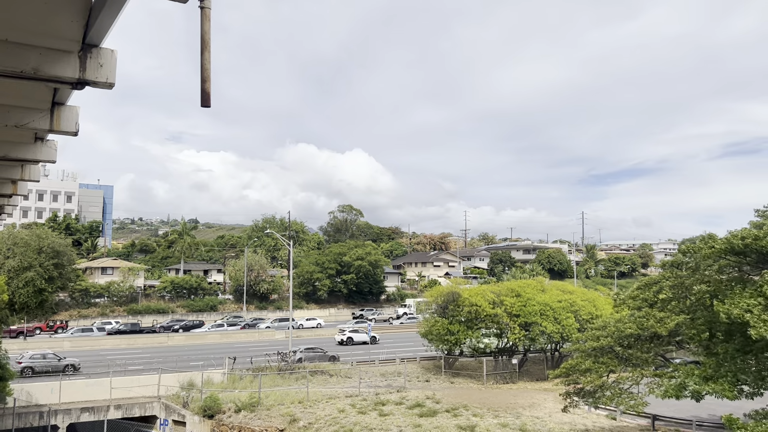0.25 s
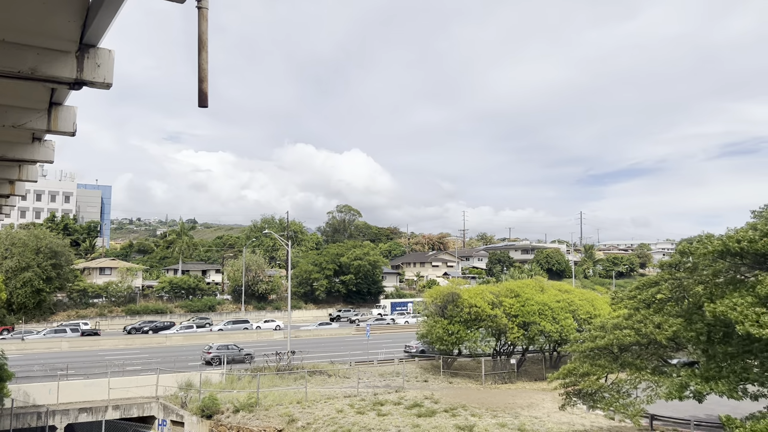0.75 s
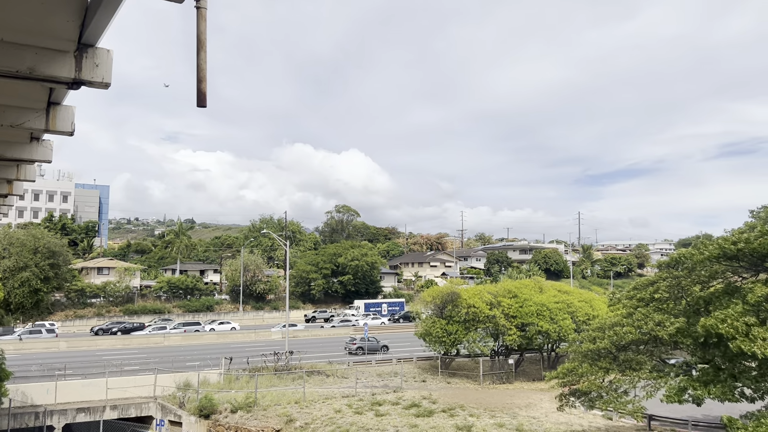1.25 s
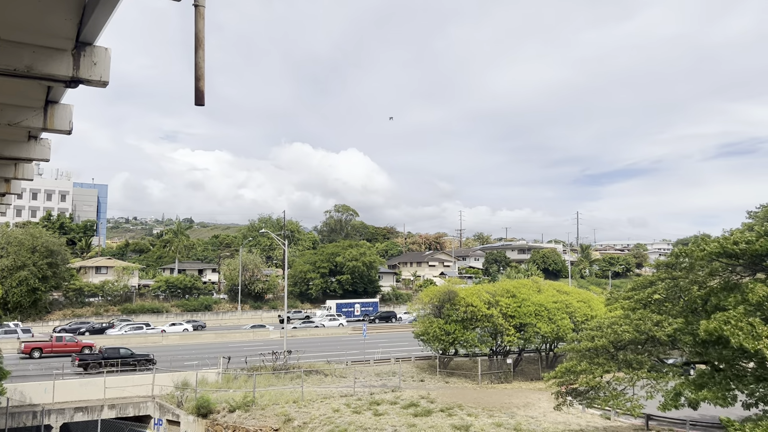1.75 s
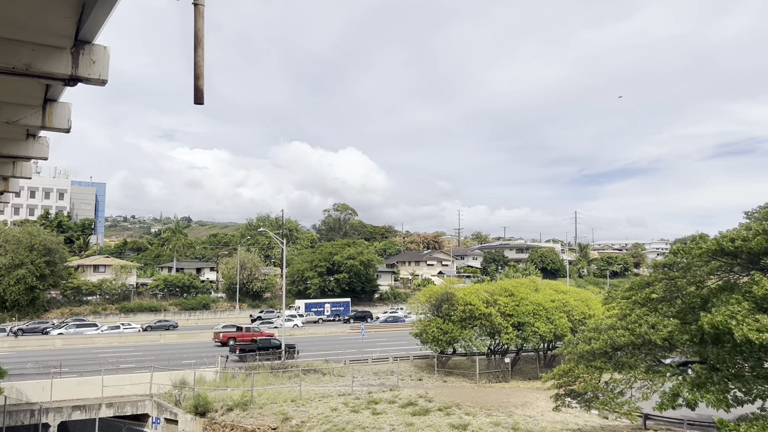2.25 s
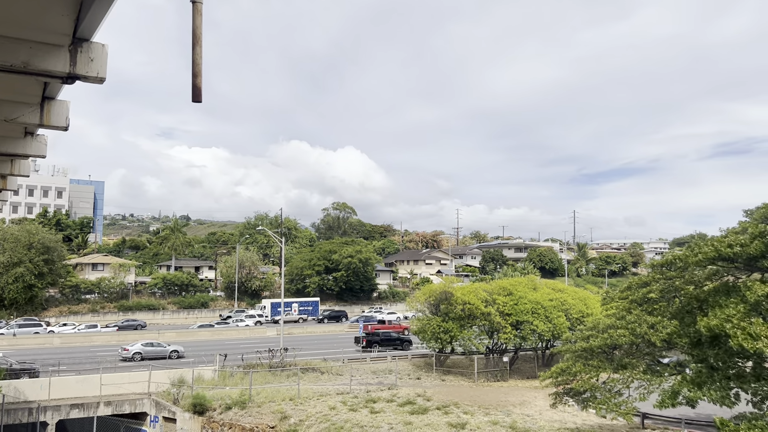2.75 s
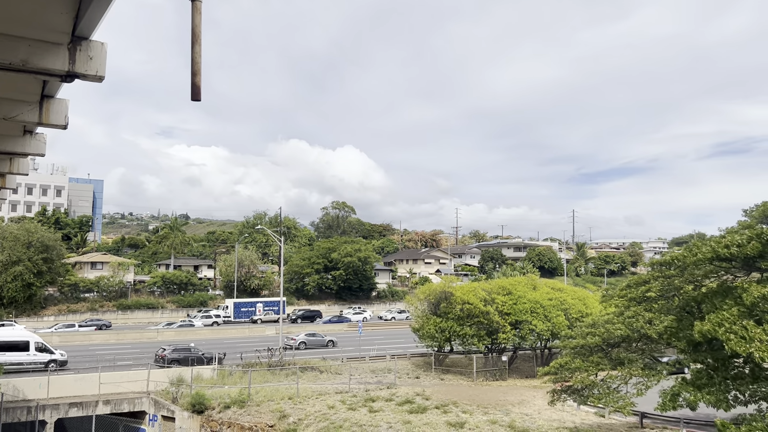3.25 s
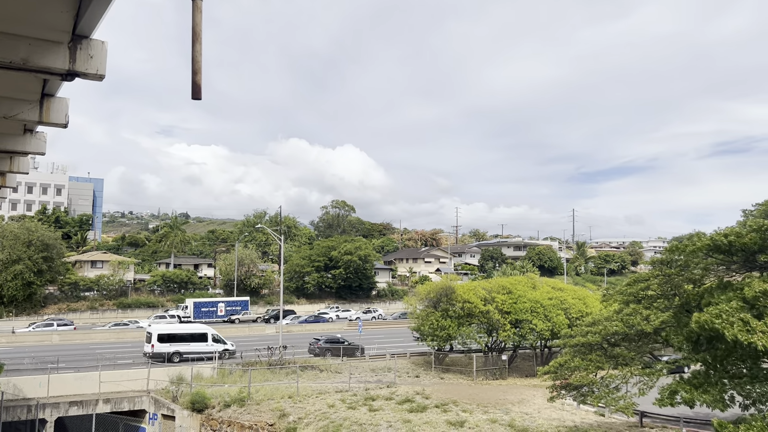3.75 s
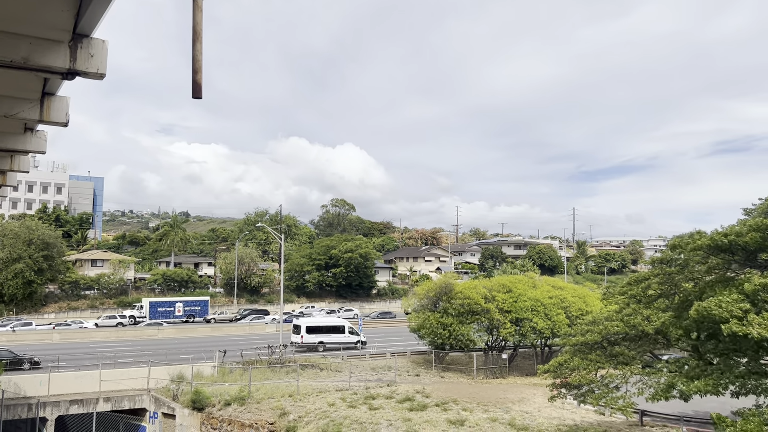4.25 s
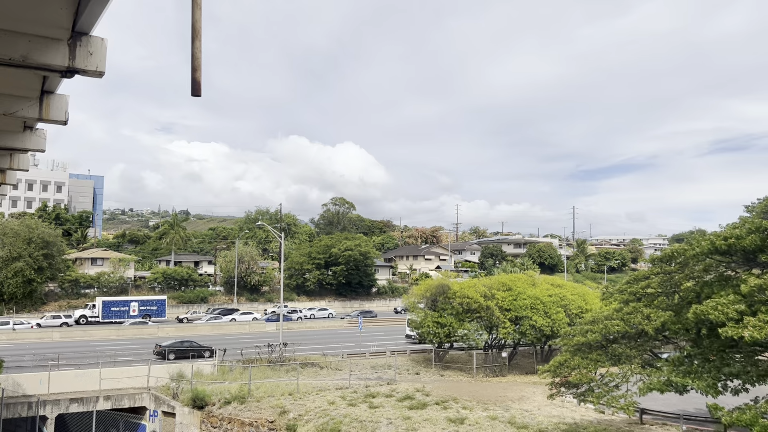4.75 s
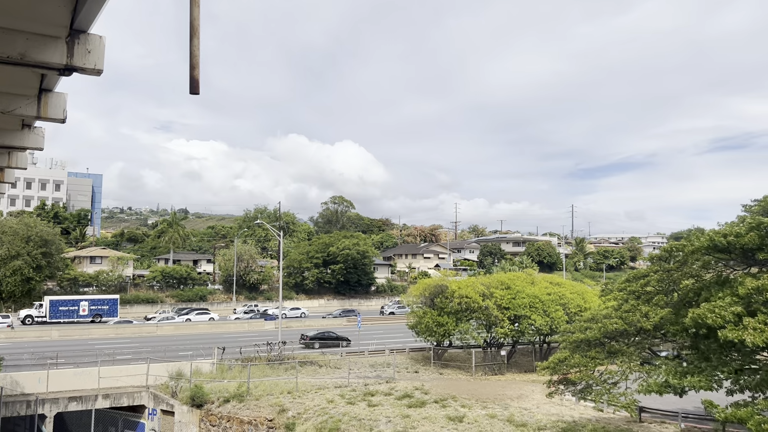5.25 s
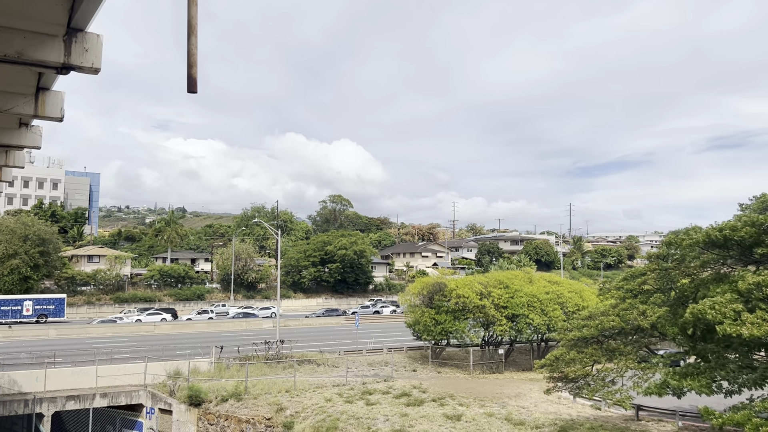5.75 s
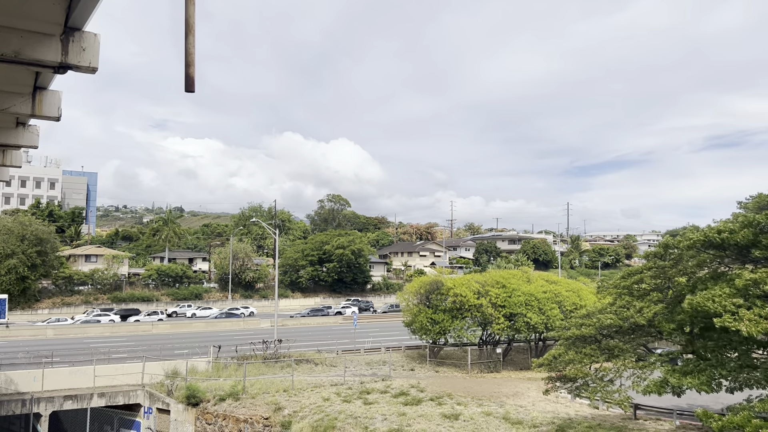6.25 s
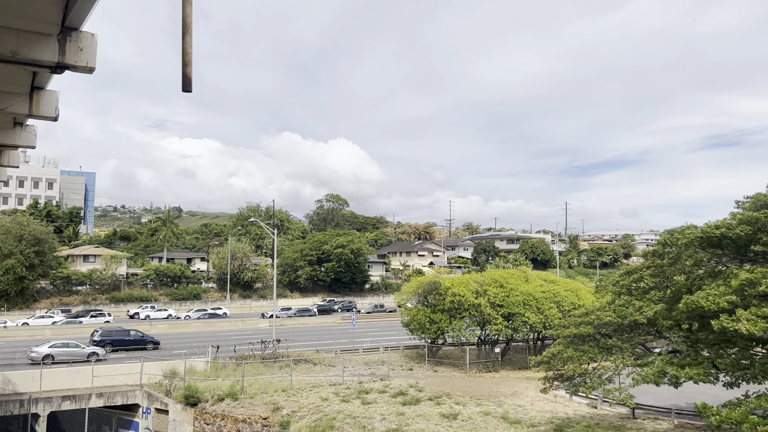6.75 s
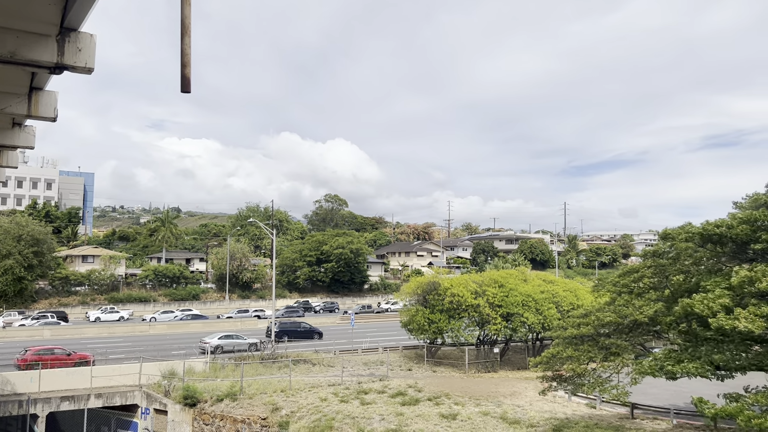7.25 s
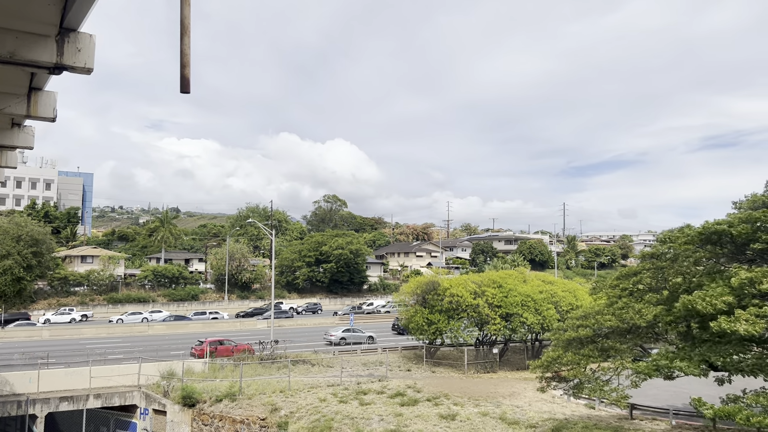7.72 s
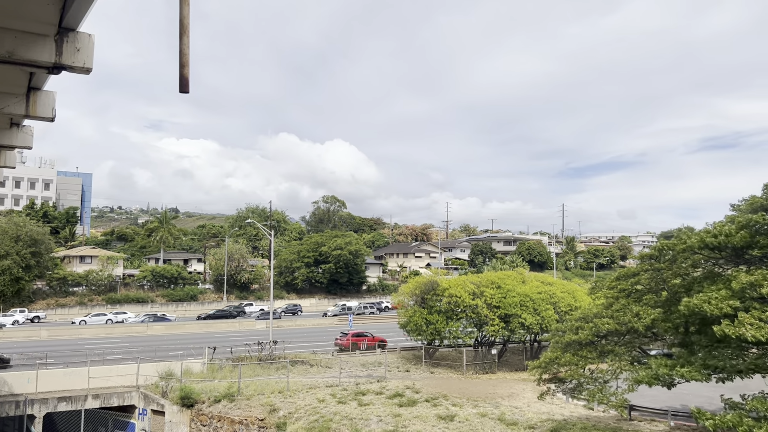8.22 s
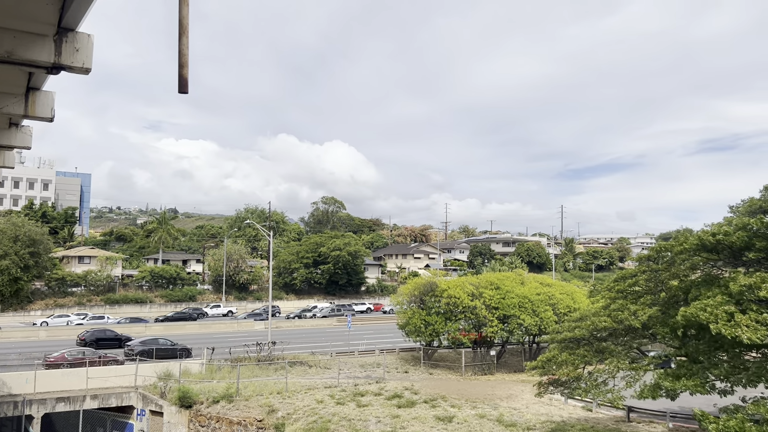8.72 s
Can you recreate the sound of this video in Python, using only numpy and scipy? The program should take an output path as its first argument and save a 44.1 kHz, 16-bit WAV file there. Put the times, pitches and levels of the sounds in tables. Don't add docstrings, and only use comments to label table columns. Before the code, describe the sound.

Steady multi-lane traffic heard at a moderate distance in the open air: overlapping broad whooshes, deep engine rumble and a thin hiss above. Heavy vehicles add short booms and droning. Gusts hit the hand-held stereo microphone with low thuds and quick flaps, then ease somewhat. Small case ticks and soft rubs cluster near the middle; a low unsteady hum persists.

```python
import sys
import numpy as np
from scipy import signal
from scipy.fft import rfft, irfft, next_fast_len
from scipy.io import wavfile
from scipy.ndimage import uniform_filter1d, map_coordinates

SR = 44100
rng = np.random.default_rng(int(sys.argv[2]) if len(sys.argv) > 2 else 0)


def natural_amplitude(level_db):
    exponent = np.asarray(level_db, float) / 20
    return 10 ** exponent


def wav_out(sig):
    wavfile.write(sys.argv[1], SR, np.round(np.clip(np.atleast_2d(sig).T, -1, 1) * 32767).astype(np.int16))


N = 396018

# (closest view [s], tyre level [dB], open stretch of road [m], engine over usual [dB], brightness [dB])
CARS = [(.22, -30, 6.6, -2, -3), (.55, -35.5, 5, 6, 1.5), (.97, -32.5, 9, 4.5, -3),
        (1.35, -36.5, 3.7, 7.5, -10), (1.75, -32.5, 4.8, -1.5, -3), (2.22, -31.5, 9.2, -3, 0.5),
        (2.76, -29, 5.2, -2, -1), (3.07, -30, 6.9, 1.5, 2.5), (3.55, -30, 7.6, 2, -1),
        (3.96, -30, 5.9, 0, 4.5), (4.3, -27.5, 3.7, -9, -2), (4.8, -30, 13.2, 1.5, 0.5),
        (5.4, -34, 7.4, 0, 2.5), (5.8, -31.5, 6.8, -1, 1), (6.06, -32, 2.2, -4, -8),
        (6.731, -32.5, 11.3, 3, -3), (7.4, -34.5, 3.7, 2, -3), (7.9, -36, 18, -3.5, 1),
        (8.63, -32.5, 11, -1.5, -3.5), (8.88, -35, 1.9, -0.5, -3)]
# (roar, tyre, sing, hiss [dB])
CAR_OVER_TYRE_DB = [2, -0.1, -11.5, -30.5]
# (roar, tyre, sing, hiss [dB])
FAR_STREAM_DB = [-27, -34.5, -43, -61]
SPEED_M_S = 27
HISS_BRIGHTENS = 0.98

# (frequency [Hz], density [dB per Hz], left-right balance [dB], likeness [0-1], left lead [rad])
ENGINE_ROAR = [(22, -26.5, -5.5, 0.63, -0.7), (32, -20, -2.5, 0.69, -0.5), (45.7, -14, -5.5, 0.62, -0.9),
               (62.5, 0.5, -2.5, 0.78, -0.84), (84, 0, 2.3, 0.25, -1.5), (121, -4, 1, 0.47, -1.2),
               (182, -9, -2.5, 1, 0.89), (260, -9.5, 2, 0.9, 0.033), (320, -11.5, 2.5, 0.56, 0.7),
               (387, -11, 8, 0.86, -0.44), (450, -10.5, -1, 0.85, -0.6), (555, -14.5, 1.5, 0.42, -0.81),
               (630, -14.5, -4, 0.77, -0.8), (699, -16.5, 3.5, 0.8, -0.79)]
TYRE_RUSH = [(700, -2, -1.4, 0.66, -0.8), (760, 0, -1.9, 0.74, -0.7), (830, 0, -3.3, 0.63, -0.6),
             (920, 0, -0.7, 0.58, -0.9), (1000, 0, -2.3, 0.6, -1.1), (1100, -2, -1.6, 0.55, -1.4),
             (1180, -3, -2.6, 0.51, -1.8), (1250, -4, -3.7, 0.5, -2.7), (1350, -4, -3.0, 0.47, -3.0),
             (1450, -4, -2.1, 0.46, -3.2), (1540, -5, -1.1, 0.44, -3.4), (1620, -8, -0.0, 0.27, -3.7)]
TREAD_SING = [(1670, 0, 4.6, 0.32, -0.2), (1750, -1, 4.8, 0.82, 0.1), (1900, 0, 3.2, 0.9, 0.1),
              (2000, -2, 3.8, 0.8, 0.1), (2150, -6, 3.0, 0.66, 0.3), (2300, -9, 1.7, 0.53, 0.6),
              (2450, -12, 1.0, 0.5, 0.4), (2600, -15, 2.6, 0.4, 0.3), (2850, -17, 1.6, 0.33, 1.2),
              (3100, -21, 0.6, 0.16, 2.2), (3400, -23, 0.8, 0.22, 1.9), (3700, -24, 0.1, 0.24, 0.4)]
FAR_HISS = [(3700, -1, 0.1, 0.24, 0.4), (4100, -3, 0.4, 0.48, 0.3), (4700, 0, 1.5, 0.51, 0.2),
            (5200, -1, 2.4, 0.15, -1.4), (5700, -5, 1.9, 0.06, -1.3), (6300, -10, -1.3, 0.43, -0.4),
            (7000, -14, -1.6, 0.69, -0.0), (7800, -19, -1.2, 0.33, -0.8), (8600, -24, -0.1, 0.52, -1.9),
            (9200, -26, -0.2, 0.71, -3.0), (9350, -20, 0, 0.4, -2.2), (9780, -20, 0, 0.4, -2.2),
            (9950, -34, 0.2, 0.9, -3.1), (10500, -35, 0.4, 0.91, -3.2), (11300, -35, -0.1, 0.37, -4.4),
            (12500, -38, 0.1, 0.97, -6.3), (14300, -41, 0.1, 0.33, -7.5)]
WIND_NOISE = [(22, -21, -3.5, 0.83, -1), (32, -13, -3.5, 0.7, -1), (43.3, 0.5, -1, 0.4, -2.5),
              (59, 3, -1.5, 0.8, -1.1), (84.5, -3, -1.8, 0.5, -2.0), (123, -10, -0.5, 0.82, -2.5),
              (183, -5.5, -0.5, 0.97, -3), (233, -12.5, -3.5, 0.97, -2), (296, -13.5, -1.5, 0.51, -2.5),
              (350, -12, -4.5, 0.6, -0.5), (443, -20, -2.5, 0.93, -0.5), (600, -21, -2, 0.92, -1),
              (800, -28.5, -1.5, 0.6, 0), (1028, -21.5, -5, 0.26, -1)]

# (frequency [Hz], width [Hz], left lead [rad], [(time [s], peak level [dB], half length [s])])
HEAVY_VEHICLES = [
    (380, 190, -0.5, [(.3, -35, .08), (.85, -37, 0.044), (1.6, -36, .15), (2.15, -34, .12), (3.98, -32, .08), (4.3, -29.5, 0.096), (5.05, -36, .08), (5.5, -35.5, .15), (6.05, -30, 0.05), (6.5, -36, .1)]),
    (810, 280, -0.8, [(.3, -36, 0.14), (1.75, -36, .15), (2.1, -35, .15), (2.45, -37, 0.11), (2.75, -30.5, .13), (4.3, -35.5, 0.13), (5.0, -38, 0.12)]),
    (4750, 690, 0.2, [(.58, -60, 0.13), (2.2, -63, .2), (3.05, -61, .2), (3.9, -64, .15), (5.7, -68, .2)]),
]
# (time [s], frequency [Hz], level [dB], fourth overtone level [dB])
TREAD_WHINE = [
    [(1.45, 729, -48, -87), (1.62, 770, -33, -80), (1.75, 834, -31, -67), (1.9, 810, -35, -73),
     (2.3, 783, -39, -69), (2.6, 810, -34.5, -70), (2.78, 774, -32, -82), (2.95, 744, -47, -90)],
    [(4.05, 750, -52, -95), (4.2, 798, -43, -78), (4.35, 800, -38, -84), (4.55, 836, -45, -82)],
]

# (time [s], peak level [dB], half length [s], flutter over thump [dB])
GUSTS = [(0, -19, 0.048, 1.5), (0.335, -13, 0.096, -8), (0.85, -17.5, 0.057, 0.5),
         (0.998, -18.5, 0.055, -20), (1.198, -29, 0.055, 6), (1.356, -16.5, 0.12, -10.5),
         (1.916, -29, 0.099, 7.5), (2.09, -14, 0.094, -4.5), (2.275, -23, 0.039, -3),
         (2.49, -22, 0.04, -14), (2.797, -35, 0.035, 14), (2.96, -25, 0.072, -10), (3.232, -23, 0.11, -1.5),
         (3.6, -19.5, .05, -3), (3.977, -22, 0.097, 2.5), (4.202, -16.5, 0.039, -6),
         (4.304, -24, 0.043, 7.5), (4.397, -17.5, 0.059, -7), (4.775, -24.5, 0.087, -3.5),
         (5.064, -23.5, .08, -1), (5.357, -20.5, 0.09, -22), (5.702, -22, 0.046, -12),
         (6.047, -28, 0.19, 1.5), (6.314, -22.5, 0.067, -7), (6.5, -20.5, 0.04, -9.5),
         (6.92, -22, 0.031, -14), (7.262, -27, 0.15, -13.5), (7.76, -20, .06, -24), (8.58, -21, 0.046, -23)]
LAST_GUST = (11, -21, 0.036, -8)
BREEZE_DB, BREEZE_FLUTTER_DB, CALMS_DB_PER_S = -25, -6, 0.87
# (time [s], peak level [dB], frequency [Hz])
SLAPS = [(0.055, -9.5, 1040), (0.234, -13, 324), (0.266, -11, 403), (0.411, -17, 900), (0.745, -11.5, 360),
         (0.813, -10.5, 364), (0.839, -8, 339), (1, -10.5, 253), (1.244, -13.5, 376), (2.048, -11.5, 381),
         (2.076, -7.5, 780), (2.115, -10.5, 298), (2.223, -14, 350), (2.642, -8, 865), (3.978, -9, 326),
         (4.174, -15, 393), (4.256, -12.5, 348), (4.373, -14, 373), (5.676, -16, 392), (6.047, -14.5, 360),
         (6.323, -16.5, 364)]
# (time [s], peak level [dB], frequency [Hz])
THUDS = [(0.268, -19, 64.6), (0.808, -20, 60.6), (0.986, -11.5, 55.6), (1.052, -10.5, 69),
         (1.371, -12.5, 48.9), (1.766, -17, 61.9), (2.024, -10, 68.8), (2.111, -18, 53),
         (2.221, -11.5, 64.6), (3.189, -16, 58.4), (4.184, -11.5, 60.8), (4.356, -7, 47),
         (4.471, -16, 71.8), (5.041, -11.5, 57), (5.684, -24, 72), (6.29, -17.5, 53.8),
         (6.897, -12.5, 53.3), (7.739, -12.5, 53.8), (8.943, -9, 58.2)]

# (time [s], peak level [dB], dull part [dB])
TICKS = [(0.3474, -56, -2.5), (0.973, -52, -9), (2.0163, -53, 0), (2.121, -54, 0), (3.476, -54, -6),
         (4.3281, -58, 2), (2.2283, -45.5, 1.5), (3.681, -45, 6), (4.7137, -53, -3), (4.8212, -55, 9),
         (4.8329, -47, 7), (4.8474, -60, 5), (4.8674, -58, -4), (4.9144, -63, 27), (5.2813, -50, 3),
         (4.5135, -43, 6), (4.5165, -40, 7), (4.5295, -52, 0)]
# (start [s], length [s], level [dB])
RUBS = [(.335, .04, -56), (0.48, 0.086, -56), (0.621, 0.098, -56.5), (2.436, 0.068, -55.5),
        (4.605, .1, -56), (4.688, 0.043, -56), (4.792, 0.082, -55), (4.907, 0.023, -61),
        (5.675, 0.057, -59), (6.24, 0.095, -55), (7.366, .06, -64)]
# (frequency [Hz], width [Hz], level [dB])
CASE_MODES = [(4800, 1300, 0), (7000, 2200, -3), (8600, 1800, -14), (12000, 5000, -23), (15000, 3000, -31)]

# (frequency [Hz], rms level [dB], start [s], end [s], waver [dB], left lead [rad])
HUM_TONES = [
    (359.7, -39.5, 0, 10, 3.5, -0.1),
    (387, -44.5, 0.5, 10, 4.5, 0.1),
    (249, -39, 7.5, 8.94, 2.5, 0),
    (149.3, -34, 2.5, 4.04, 2, 0.2),
]


def unit(x):
    return x / np.sqrt(np.mean(x ** 2) + 1e-20)


def curves(rows):
    s, *cols = np.transpose(rows)
    return [np.interp(np.arange(N) / SR, s, c) for c in cols]


def wobble(rate):
    coarse = np.arange(0, N + 64, 64)
    knots = rng.standard_normal(int(N * rate / SR) + 4)
    return np.interp(np.arange(N), coarse, map_coordinates(knots, [coarse * rate / SR]))


def filtered(x, response):
    m = next_fast_len(N + 8192)
    return irfft(rfft(x, m) * response(np.fft.rfftfreq(m, 1 / SR)), m)[..., :N]


def swells(s, db, half_s, floor_db):
    t = np.arange(0, N + 256, 256) / SR
    bells = natural_amplitude(2 * db)[:, None] * np.exp(-((t - s[:, None]) / np.abs(half_s)[:, None]) ** 2)
    power = bells.sum(0) + natural_amplitude(2 * (floor_db + 0 * t))
    return np.interp(np.arange(N) / SR, t, 10 * np.log10(power))


def rush(layer, patchy_db):
    z = signal.stft(rng.standard_normal((2, N)), nperseg=512)[2]
    field = uniform_filter1d(rng.standard_normal(z.shape[1:]), size=5, axis=0)
    patches = uniform_filter1d(field, size=14, axis=1)
    pair = signal.istft(z * natural_amplitude(patchy_db * unit(patches)), nperseg=512)[1][:, :N]
    m = next_fast_len(N)
    hz, (a, b) = np.fft.rfftfreq(m, 1 / SR), rfft(pair, m)
    f, *cols = np.transpose(layer)
    level_db, pan_db, alike, lead = [np.interp(np.log(hz + 1), np.log(f + 1), c) for c in cols]
    turn = np.arccos(np.clip(alike, 0, 1)) / 2
    common, apart = np.cos(turn) * a, np.sin(turn) * b
    inside = (hz > f[0] * .99) & (hz < f[-1] * 1.01)
    left = (common + apart) * natural_amplitude(level_db + pan_db / 2) * np.exp(.5j * lead)
    right = (common - apart) * natural_amplitude(level_db - pan_db / 2) * np.exp(-.5j * lead)
    return unit(irfft(np.array([left, right]) * inside, m)[:, :N])


def evened(x, seconds, share):
    power = np.abs(uniform_filter1d(np.mean(x ** 2, 0), int(seconds * SR), mode="reflect")) + 1e-9
    return unit(x / power ** (np.clip(share, 0, 1) / 2))


def bursts(rows, cycles, lead):
    out = np.zeros((2, N + SR))
    for s, db, hz in rows:
        u = np.arange(int(6 * cycles * SR / hz)) * hz / (cycles * SR)
        swing = np.sin(2 * np.pi * cycles * u + np.array([[lead / 2], [-lead / 2]]))
        envelope = (np.e * u * np.exp(-u)) ** 1.5
        out[:, round(s * SR):][:, :len(u)] += natural_amplitude(db) * envelope * swing
    return out[:, :N]


def traffic():
    s, db, stretch_m, engine_db, bright_db = np.transpose(CARS)
    own_db = [engine_db, 0 * db, bright_db, HISS_BRIGHTENS * bright_db]
    levels = [swells(s, db + usual + own, stretch_m / SPEED_M_S, far)
              for usual, own, far in zip(CAR_OVER_TYRE_DB, own_db, FAR_STREAM_DB)]
    shared = 0.76 * wobble(2.91) + 0.24 * wobble(7.6)
    # (table, patches [dB], makeup [dB])
    layers = [(ENGINE_ROAR, 1.1, 0), (TYRE_RUSH, .9, 3), (TREAD_SING, .6, 2.5), (FAR_HISS[:10], .8, 2.5)]
    out = np.zeros((2, N))
    for level_db, (layer, patchy_db, makeup_db) in zip(levels, layers):
        out += natural_amplitude(level_db + makeup_db + shared + 0.26 * wobble(6.9)) * rush(layer, patchy_db)
    return out


def heavy_vehicles():
    a, b = rng.standard_normal((2, N))
    ports = np.array([a + .5 * b, a - .5 * b])
    out = np.zeros((2, N))
    for hz, width, lead, rows in HEAVY_VEHICLES:
        side = np.array([[.5j * lead], [-.5j * lead]])
        band = filtered(ports, lambda f: np.exp(-2 * ((f - hz) / width) ** 2 + side))
        out += natural_amplitude(swells(*np.transpose(rows), -120)) * unit(band)
    return out


def tread_whine():
    out = np.zeros((2, N))
    for rows in TREAD_WHINE:
        before, after = (rows[0][0] - .05, 700, -120, -120), (rows[-1][0] + .05, 700, -120, -120)
        hz, db, over_db = curves([before] + rows + [after])
        phase = 2 * np.pi * np.cumsum(hz * (1 + .016 * wobble(30))) / SR
        out += natural_amplitude(db + 3.7 * wobble(18) + [[1], [4]]) * np.sin(phase + [[-.35], [.35]])
        overtone = np.sin(4.05 * 2 * np.pi * np.cumsum(hz) / SR)
        out += natural_amplitude(over_db + 6 + 3 * wobble(15)) * overtone
    return out


def wind():
    s, db, half_s, over_db = np.transpose(GUSTS + [LAST_GUST])
    breeze_db = BREEZE_DB - CALMS_DB_PER_S * np.arange(N) / SR
    thump_power = natural_amplitude(2 * swells(s, db, half_s, -120)) + natural_amplitude(2 * breeze_db)
    flutter_power = natural_amplitude(2 * swells(s, db + over_db, half_s, -120)) + natural_amplitude(2 * (breeze_db + BREEZE_FLUTTER_DB))
    thump_db, flutter_db = 10 * np.log10(thump_power), 10 * np.log10(flutter_power)
    noise = rush(WIND_NOISE, patchy_db=2.5)
    low = filtered(noise, lambda hz: 1 / np.sqrt(1 + (hz / 100) ** 6))
    high = filtered(noise, lambda hz: 1 / np.sqrt(1 + (100 / (hz + 1)) ** 6))
    thump = natural_amplitude(thump_db - 2.0) * evened(low, seconds=0.027, share=0.93)
    flutter = natural_amplitude(flutter_db - 0.3 + 2.3 * wobble(25)) * evened(high, seconds=0.069, share=0.33)
    return thump + flutter


def eddies():
    thuds = natural_amplitude(-3) * bursts(np.add(THUDS, [.006, 0, 0]), cycles=1.4, lead=-1.1)
    slaps = natural_amplitude([[-5], [-2.5]]) * bursts(SLAPS, cycles=1.05, lead=-.8)
    fronts = [(s, db, 900) for s, db, hz in SLAPS if hz < 600]
    return thuds + slaps + natural_amplitude(-6) * bursts(fronts, cycles=.95, lead=-.8)


def ring(blows, modes):
    def response(f):
        total = 0
        for k, (centre, width, db) in enumerate(modes):
            loss = 1j * f * width
            total = total + (-1) ** k * natural_amplitude(db) * loss / (centre * centre - f * f + loss)
        return total
    return filtered(blows, response)


def handling():
    ticks, stroke = 0, np.zeros(N)
    for k, (hz, width, mode_db) in enumerate(CASE_MODES):
        rows = [(s, db + (dull_db if k == 0 else mode_db + 6), hz) for s, db, dull_db in TICKS]
        ticks = ticks + bursts(rows, cycles=hz / width / 2.1, lead=0)
    for s, length, db in RUBS:
        arch = np.sin(np.linspace(0, np.pi, round(length * SR)))
        stroke[round(s * SR):][:len(arch)] += natural_amplitude(db) * arch
    catches = (rng.random(N) < .015) * natural_amplitude(2 * rng.exponential(size=N))
    grains = rng.standard_normal((2, N)) * (.55 + 2.0 * catches)
    grains[1] = .75 * grains[0] + 0.62 * grains[1]
    return ticks + stroke * unit(ring(ring(grains, CASE_MODES), [(5200, 3600, 0)]))


def machine_hum():
    t, out = np.arange(N) / SR, np.zeros((2, N))
    for hz, db, start, end, waver_db, lead in HUM_TONES:
        fade = np.clip((t - start) / 0.21, 0, 1) * np.clip((end - t) / 0.37, 0, 1)
        phase = 2 * np.pi * hz * t + .9 * wobble(9) + hz / 1500 * wobble(40)
        level = natural_amplitude(db + waver_db * wobble(5.4) + [[1.4], [-1.4]])
        out += np.sqrt(2) * fade * level * np.sin(phase + [[lead / 2], [-lead / 2]])
    return out


def scene():
    road = traffic() + heavy_vehicles() + tread_whine()
    return road + wind() + eddies() + handling() + machine_hum()


def low_pass(x):
    return signal.sosfilt(signal.butter(12, 15800, fs=SR, output="sos"), x)


def record(dry):
    noisy = dry + natural_amplitude(-82) * rush(FAR_HISS[9:], patchy_db=4.0)
    x = filtered(noisy, lambda hz: 1 / np.sqrt(1 + (26 / (hz + 1)) ** 6))
    mix = x / (1 + np.abs(x / .97) ** 8) ** (1 / 8)
    return low_pass(mix)


dry = scene()
out = record(dry)
wav_out(out)
```